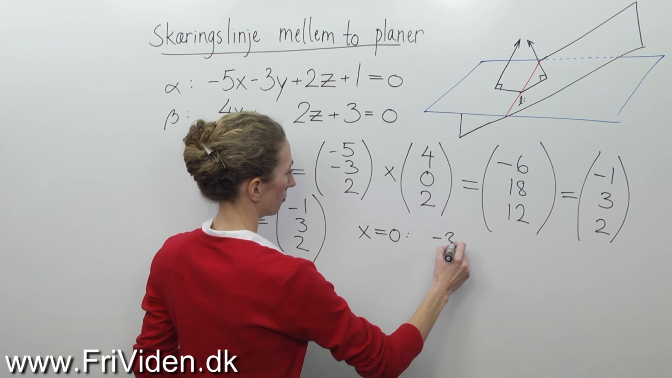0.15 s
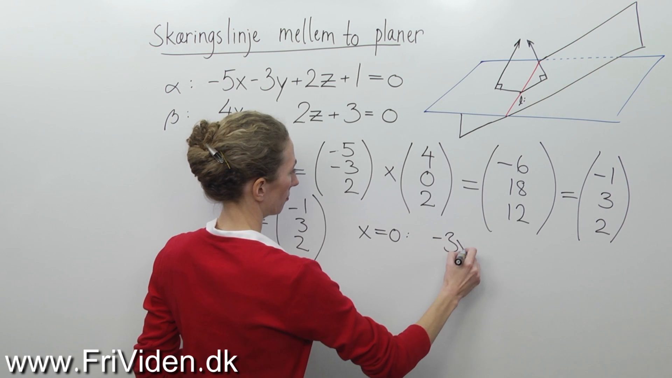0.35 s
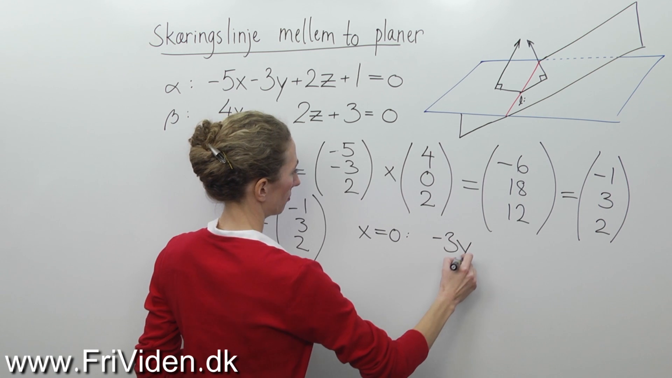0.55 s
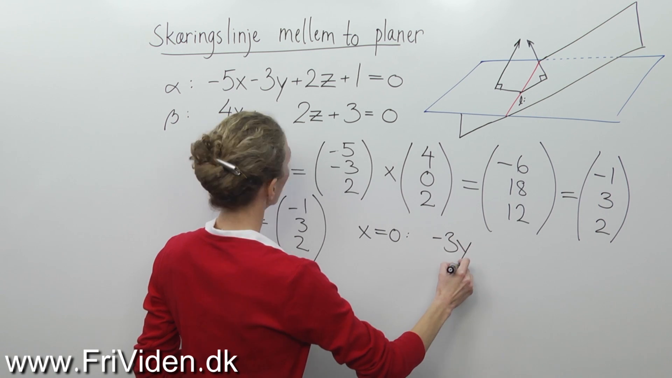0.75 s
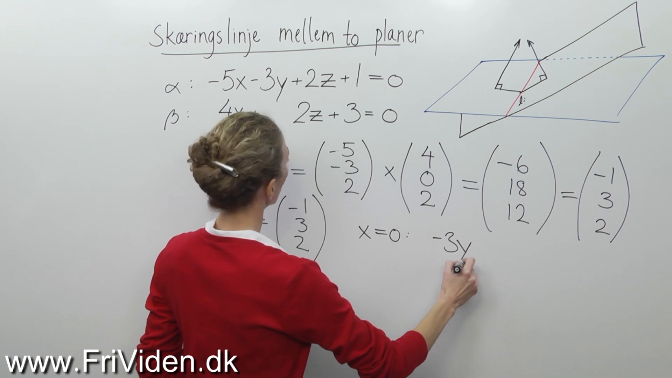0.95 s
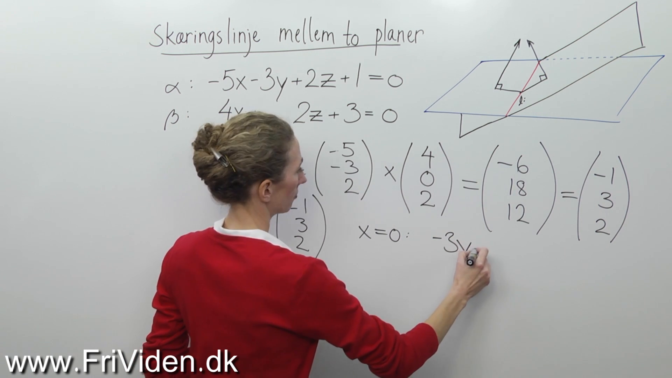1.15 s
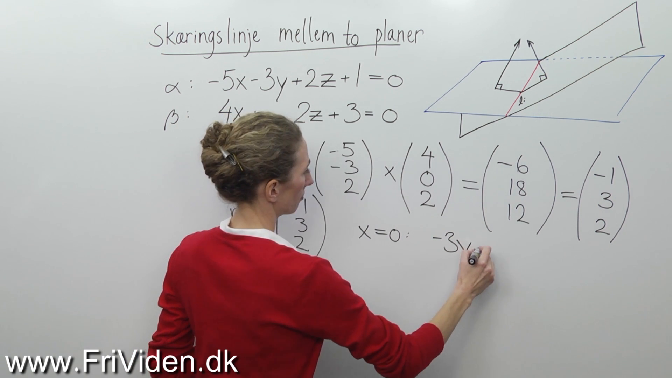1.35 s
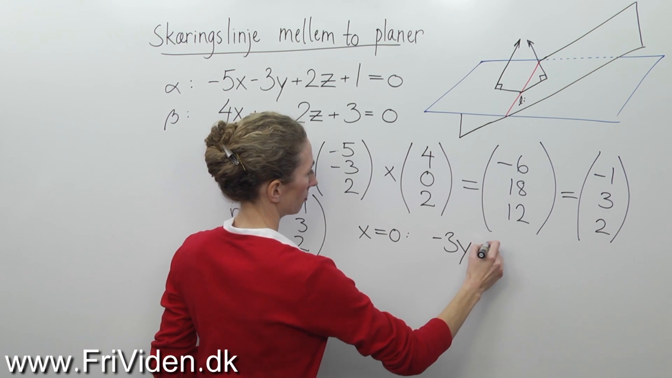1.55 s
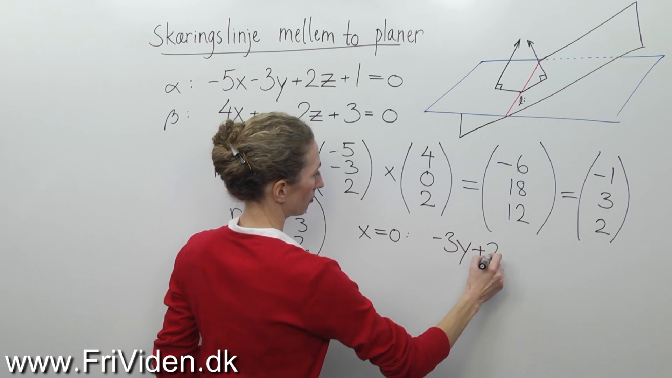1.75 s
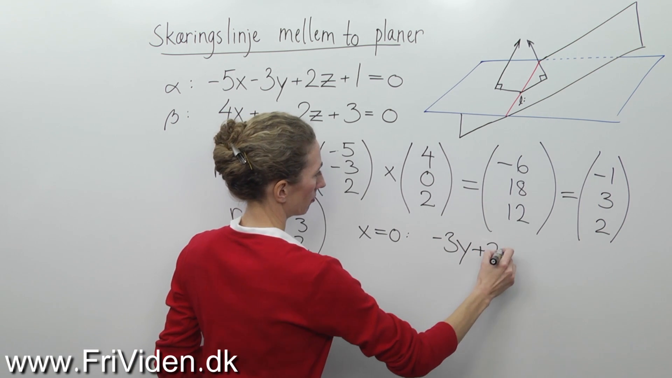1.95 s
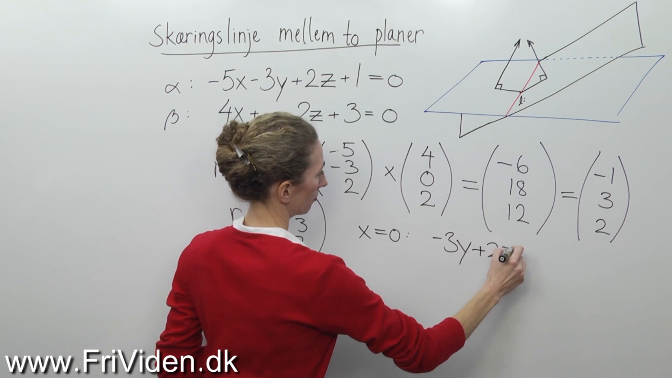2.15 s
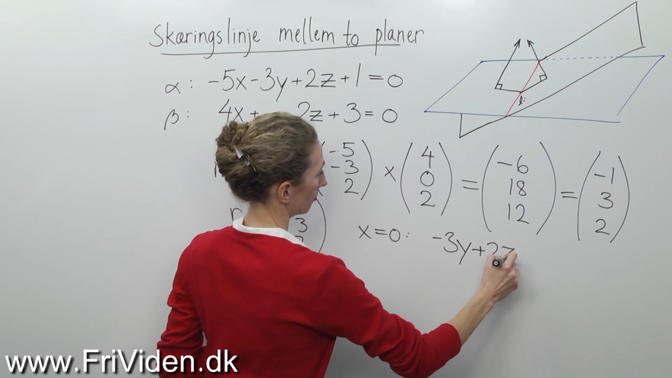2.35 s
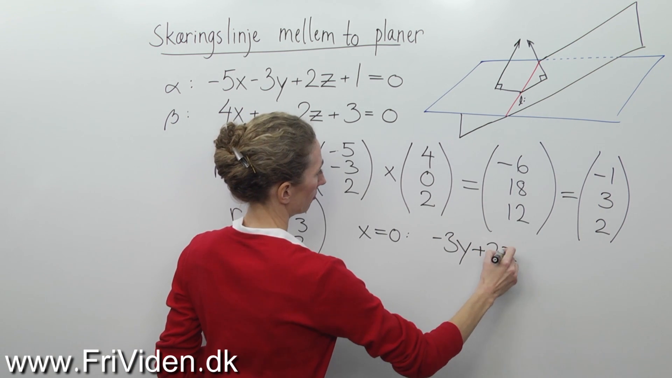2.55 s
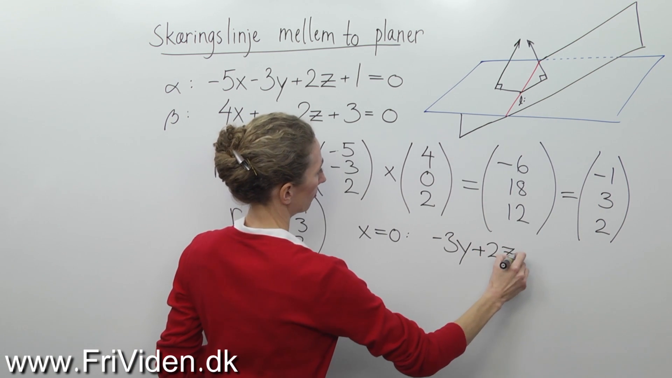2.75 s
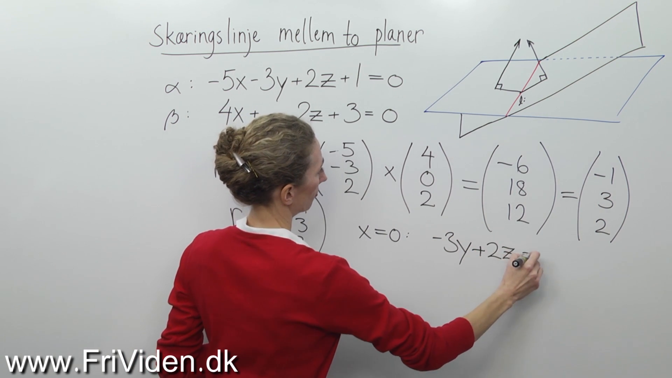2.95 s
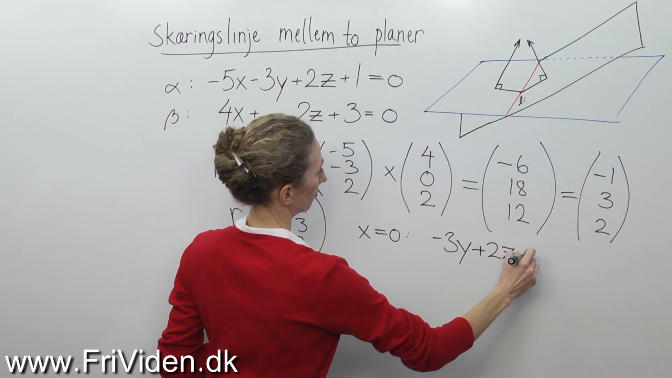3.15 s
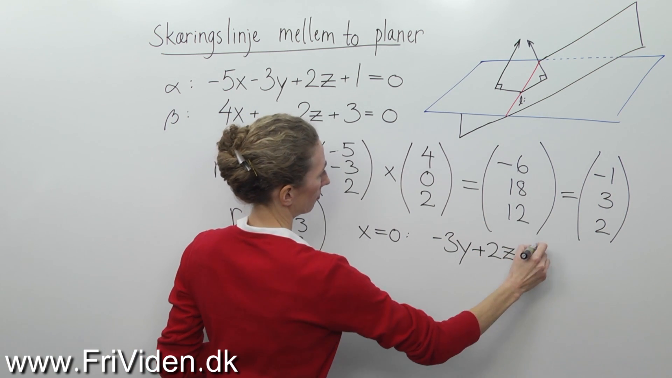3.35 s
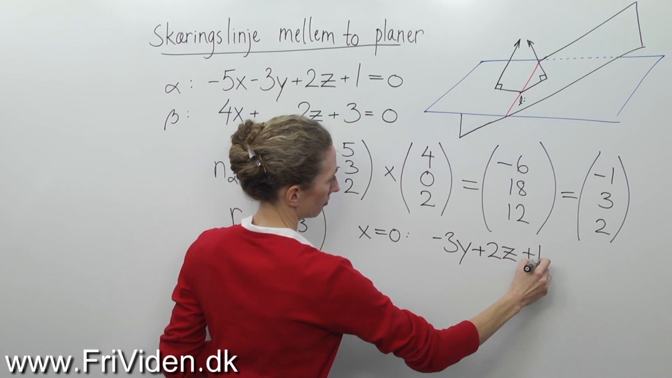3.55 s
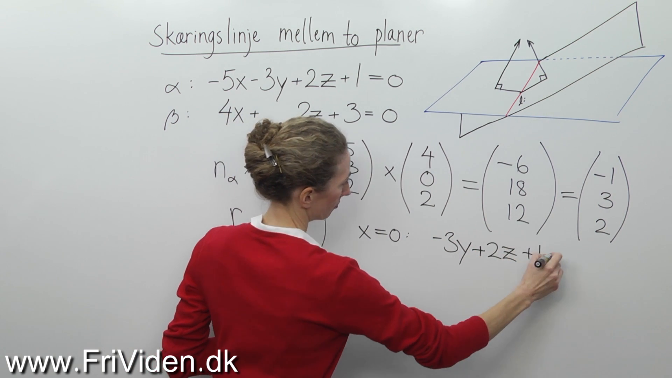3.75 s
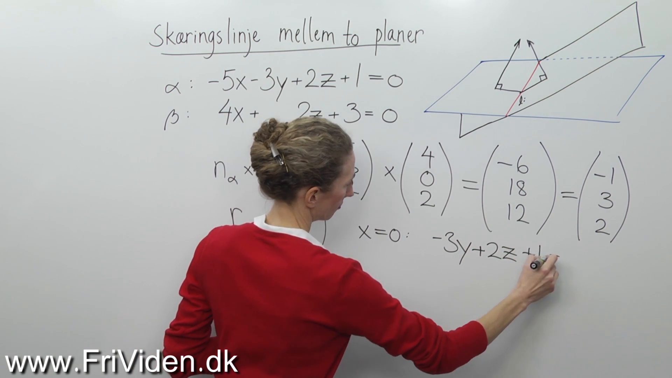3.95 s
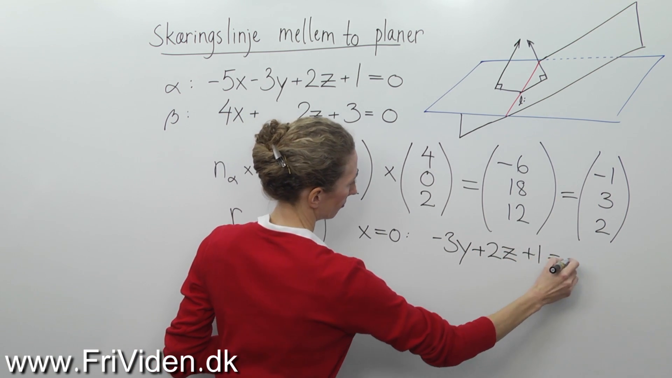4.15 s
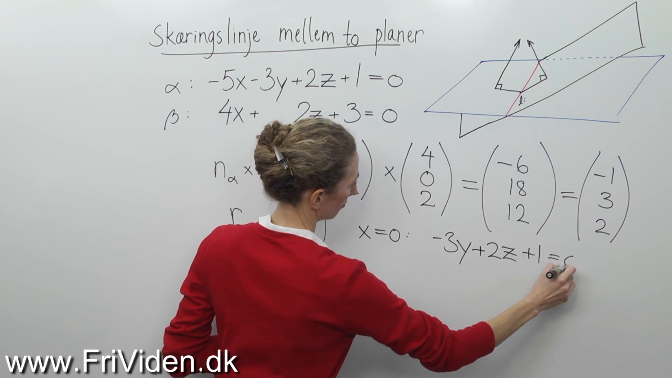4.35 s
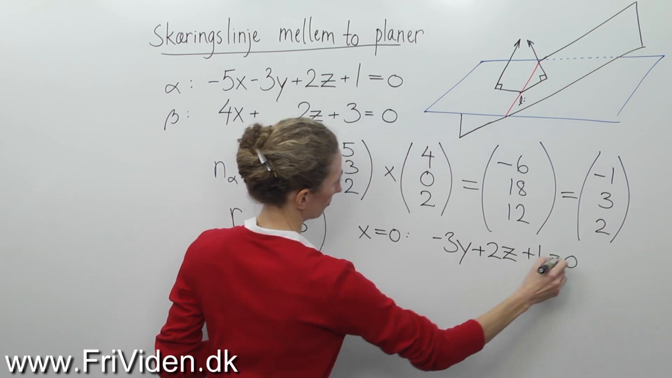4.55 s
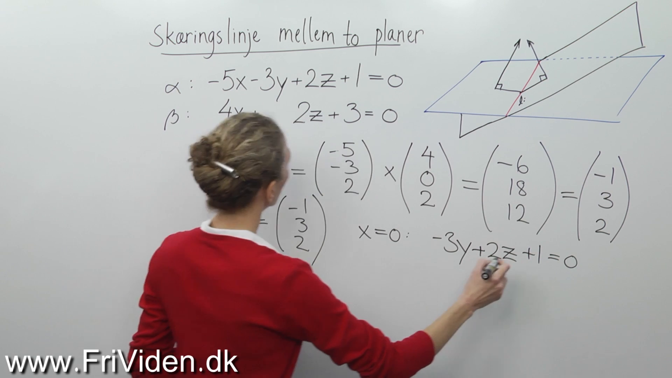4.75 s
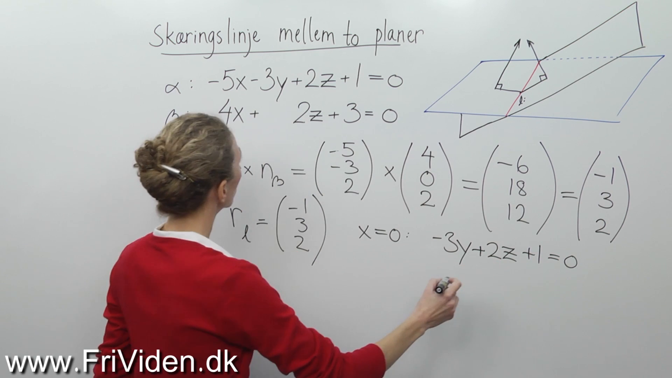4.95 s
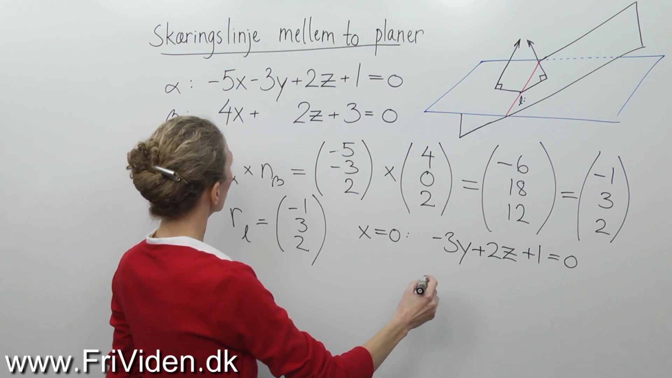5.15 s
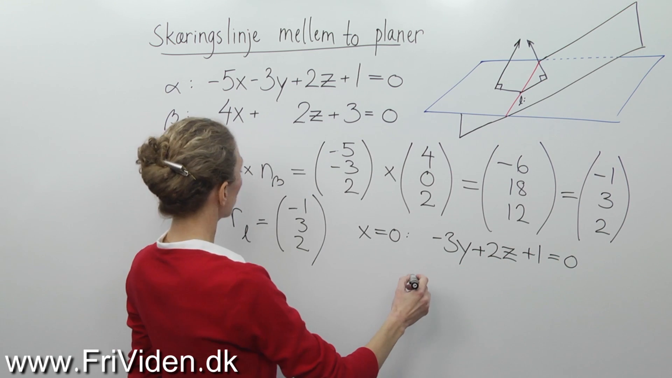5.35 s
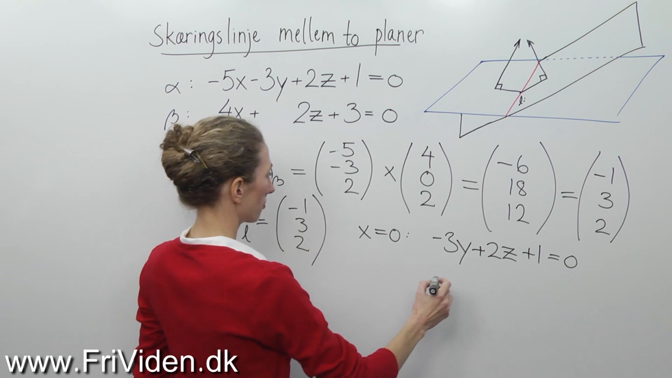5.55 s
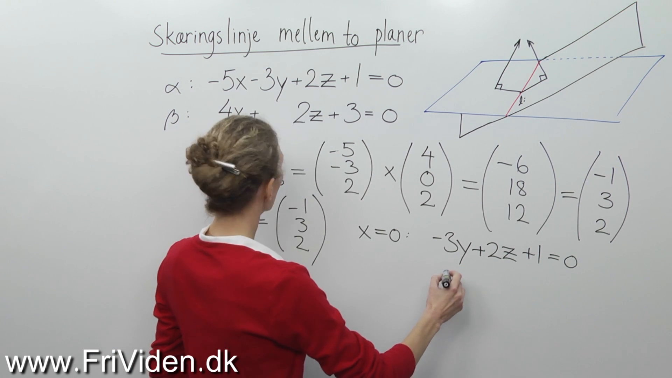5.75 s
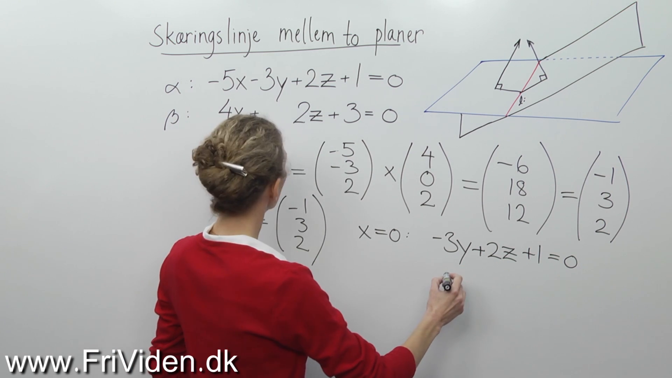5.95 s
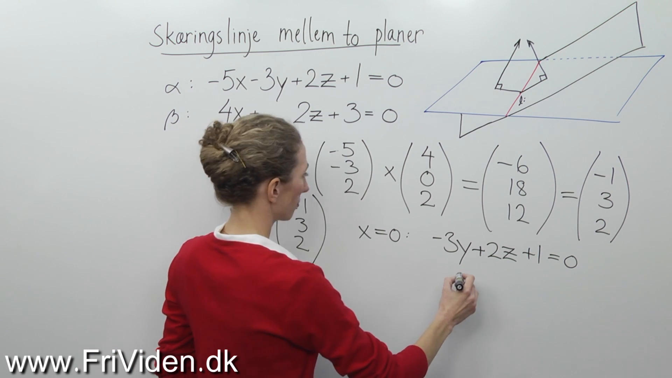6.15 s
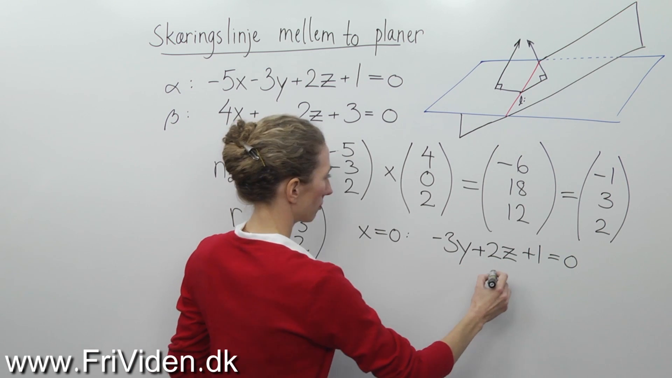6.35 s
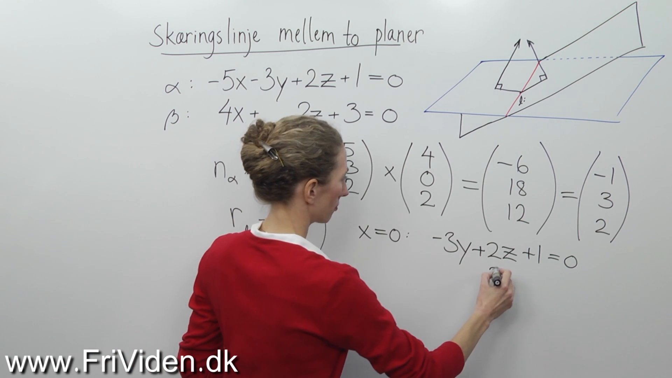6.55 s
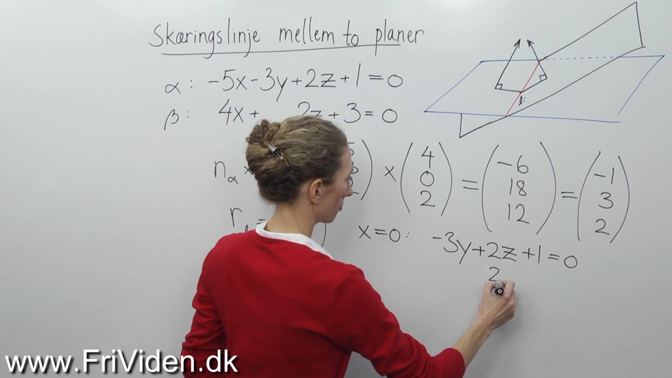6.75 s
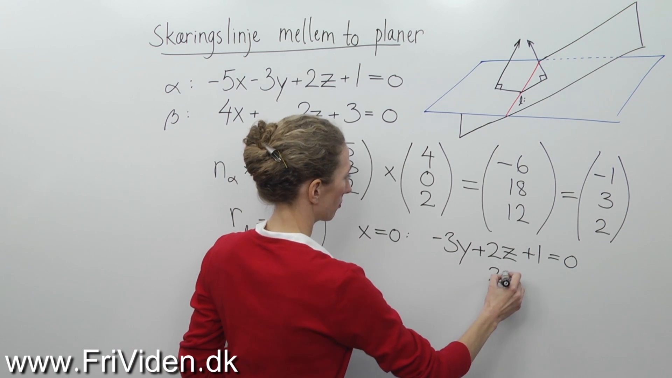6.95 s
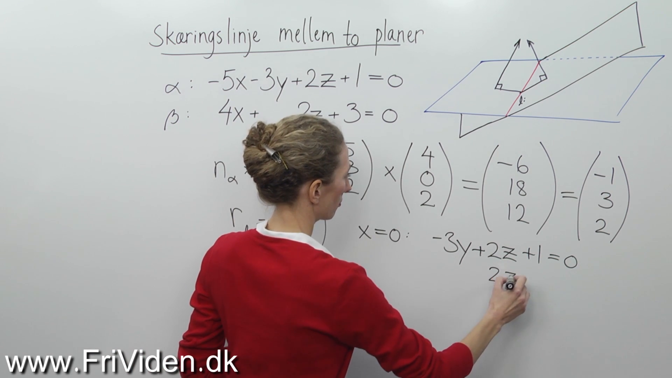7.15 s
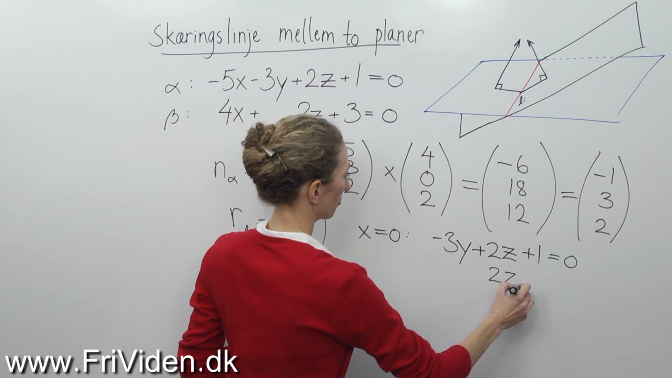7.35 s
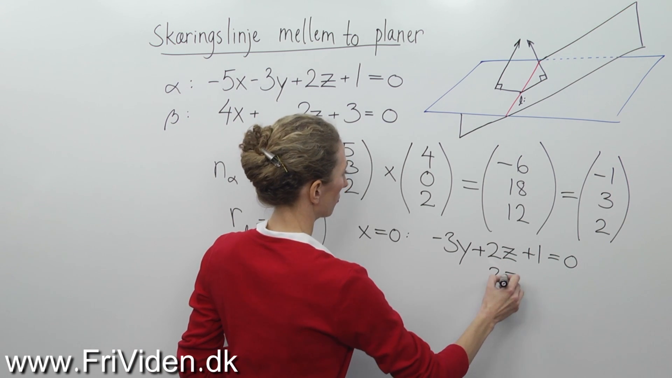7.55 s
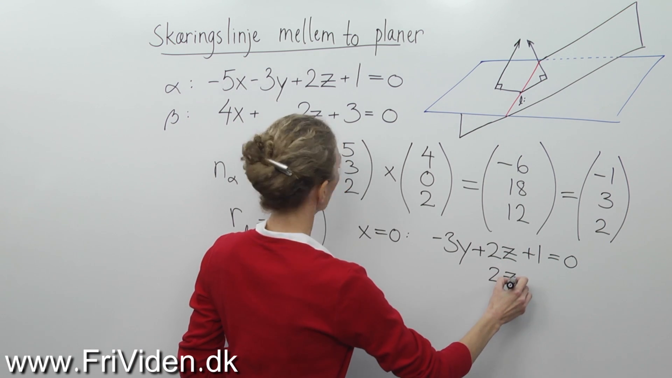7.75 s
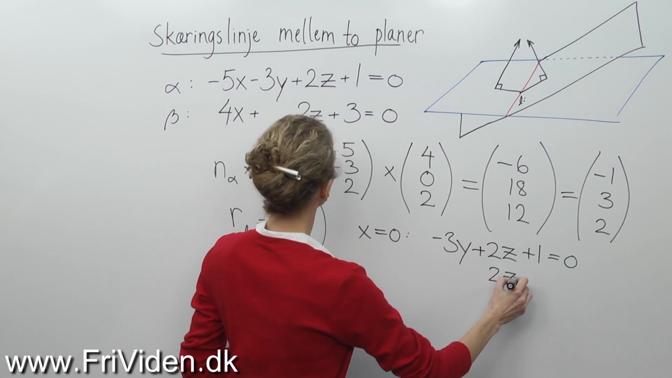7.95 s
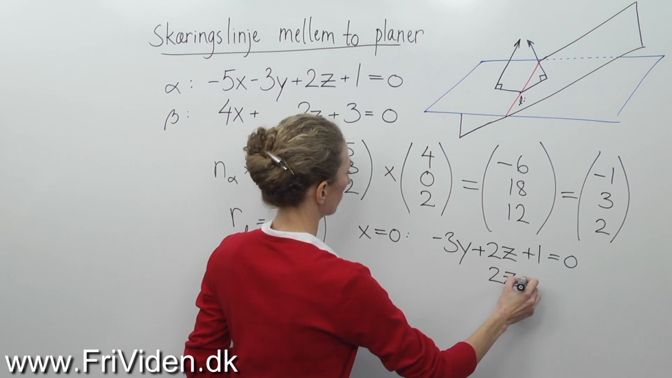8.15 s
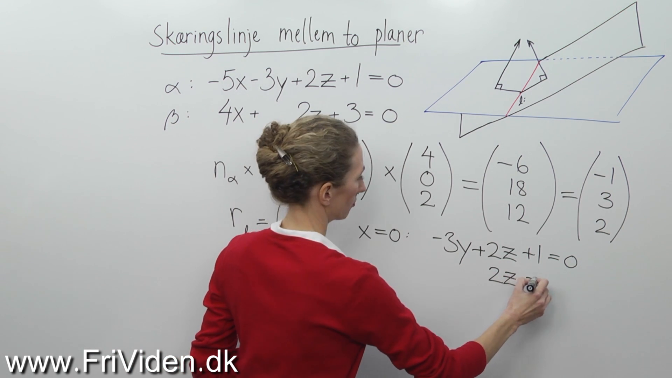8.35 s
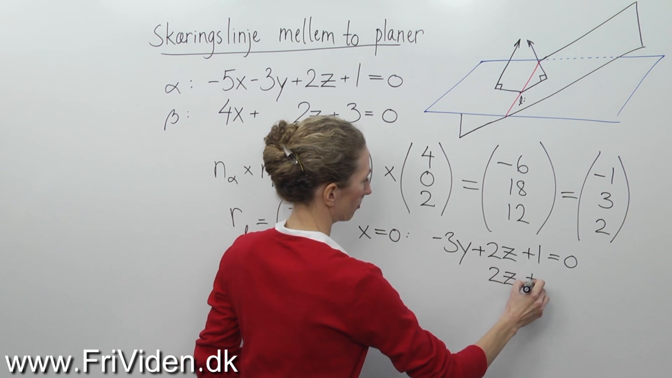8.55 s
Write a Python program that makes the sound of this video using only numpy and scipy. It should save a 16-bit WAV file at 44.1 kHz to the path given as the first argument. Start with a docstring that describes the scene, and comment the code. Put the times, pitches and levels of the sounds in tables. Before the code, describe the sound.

A felt marker taps and softly hisses across a whiteboard in short strokes, pauses with faint rustles, then resumes, over low room rumble.

```python
"""In a quiet classroom, a felt marker writes short signs on a wall-mounted whiteboard.
Each landing of the tip knocks the board: a short thud and dying sines, with echoes from the room.
Each stroke is a faint hiss, made of many tiny clicks that ring the tip.
A steady noise floor, from low rumble to faint hiss, lies under it with a fan's narrow tones.
A few faint noise rustles are heard as the arm comes away."""
import sys
import numpy as np
from scipy import signal
from scipy.io import wavfile
from scipy.ndimage import uniform_filter1d

SR = 44100
rng = np.random.default_rng(int(sys.argv[2]) if len(sys.argv) > 2 else 0)


def inscribe(sig):
    """Save sig as 16-bit PCM at rate SR to the path in sys.argv[1].

    A 1-D sig is mono; a 2-D sig holds one channel per row.
    Samples are clipped to [-1, 1] before scaling.
    """
    pcm = np.round(np.clip(np.atleast_2d(sig).T, -1, 1) * 32767)
    wavfile.write(sys.argv[1], SR, pcm.astype(np.int16))


N = 380334  # length in samples


def gain_of(db):
    """Turns decibels into an amplitude factor."""
    return 10 ** (np.asarray(db) / 20)


def evened(x):
    """Scales a sound to an rms level of 1."""
    return x / np.sqrt(np.mean(x ** 2) + 1e-20)


def slow_wander(samples):
    """Random ups and downs of rms 1: noise averaged over a number of samples."""
    return evened(uniform_filter1d(rng.standard_normal(N), samples))


def read_curve(points, hz):
    """Reads a curve between its points, along a logarithmic pitch axis."""
    point_hz, value = np.transpose(points)
    return np.interp(np.log(hz + 1), np.log(point_hz + 1), value)


def add(mix, start_s, sound):
    """Mixes a sound in at its start time."""
    part = mix[max(round(start_s * SR), 0):][:len(sound)]
    part += sound[:len(part)]


def resonate(x, hz, width_hz):
    """Rings at one pitch with a peak gain of 1; a narrower width rings longer."""
    decay = np.exp(-np.pi * width_hz / SR)
    turn = np.exp(2j * np.pi * min(hz, 0.49 * SR) / SR)
    return 2 * signal.lfilter([1 - decay], [1, -decay * turn], x).real


def noise_floor():
    """Steady noise: random waves of every pitch, weighted by a spectrum."""
    # strong low rumble thinning to faint hiss, cut off steeply near 15.9 kHz:
    # pitch_hz, relative level_db (per Hz)
    floor_spectrum = [(10, -8.5), (25, -11.5), (58, -1), (75, -2.5), (92, -7), (120, -9), (250, -15.5),
                      (500, -24.5), (1000, -31.5), (2500, -39), (6000, -43), (13400, -46), (15750, -46),
                      (15950, -73)]
    floor_db = -55  # rms level
    hz = np.fft.rfftfreq(4096, 1 / SR)
    real, imaginary = rng.standard_normal((N // 1024 + 5, len(hz), 2)).T
    spectrum = (real + 1j * imaginary) * gain_of(read_curve(floor_spectrum, hz)[:, None])
    noise = signal.istft(spectrum, nperseg=4096, noverlap=3072)[1][:N]
    return gain_of(floor_db) * evened(noise)


def fan_tones():
    """The ventilation fan hums: each blade tone is a steady sine plus narrow noise around it."""
    # blade tones of the fan: multiple of fan_hz, width_hz of the noisy part, level_db (rms)
    blade_tones = [(1, 4, -67.5), (4, 3, -87), (5, 3, -84)]
    fan_hz = 170
    t, out = np.arange(N) / SR, np.zeros(N)
    for multiple, width_hz, level_db in blade_tones:
        tone_hz = multiple * fan_hz
        steady = np.sqrt(2) * np.sin(2 * np.pi * tone_hz * t)
        unsteady = 1.7 * evened(resonate(rng.standard_normal(N), tone_hz, width_hz))
        out += gain_of(level_db) * evened(steady + unsteady)
    return out


def fibre_slips():
    """Felt fibres slip on the board: dense tiny clicks of uneven strength, stronger in clumps."""
    slips_per_s, spread_db = 7000, 2.5
    slips = (rng.random(N) < slips_per_s / SR) * rng.choice([-1., 1.], N)
    slips *= gain_of(spread_db * np.minimum(rng.exponential(1, N), 5))
    return slips * gain_of(1.5 * slow_wander(250))


def ring_tip(slips, resonances):
    """The slips ring the tip; each resonance is passed twice for steeper sides."""
    ringing = np.zeros(N)
    for hz, width_hz, level_db in resonances:
        once = resonate(slips, hz, width_hz)
        ringing += gain_of(level_db) * resonate(once, hz, width_hz)
    return evened(ringing)


def felt_strokes():
    """The felt slides: flat and edge of the tip hiss differently, and the barrel squeaks."""
    # strokes: middle_s, length_s (at half power), level_db (rms of the full hiss, without squeak),
    # share drawn with the edge of the tip (0-1)
    strokes = [(0.028, 0.032, -71.6, 0.7), (0.108, 0.055, -70, 0.4), (0.353, 0.062, -72, 0.6),
               (0.46, 0.055, -75, 0.25), (0.611, 0.1, -74.3, 0.3), (1.249, 0.054, -70.5, 0.2),
               (1.456, 0.042, -78, 0), (1.671, 0.054, -72, 0.1), (1.749, 0.031, -73, 0),
               (1.857, 0.056, -69, 0.1), (2.152, 0.053, -69.5, 0), (2.322, 0.062, -77, 0),
               (2.448, 0.055, -71.5, 0), (2.725, 0.048, -69.5, 0), (2.994, 0.056, -72.5, 0),
               (3.261, 0.076, -81, 0), (3.528, 0.09, -79, 0), (3.834, 0.06, -73.5, 0),
               (4.08, 0.039, -74, 0), (4.418, 0.089, -74, 0.1), (4.541, 0.039, -77, 0.2),
               (6.629, 0.042, -70, 1), (6.702, 0.036, -75, 0.8), (6.819, 0.056, -65.5, 1),
               (7.094, 0.054, -69, 0.8), (7.241, 0.064, -76, 0.6), (7.399, 0.059, -68.2, 0.7),
               (7.66, 0.048, -70, 0.84), (8.381, 0.045, -71, 0.8)]
    # ringing of the flat of the tip: pitch_hz, width_hz (of each pass), level_db
    flat_resonances = [(3730, 8000, -7.5), (7200, 1600, -4), (10120, 3700, 3), (13000, 5700, -12.5),
                       (15900, 840, -4)]
    # ringing of the edge of the tip: pitch_hz, width_hz (of each pass), level_db
    edge_resonances = [(4970, 3200, -11.5), (6900, 600, -8), (8400, 1300, -7.5), (11500, 13000, -17),
                       (16300, 3500, -0.5)]
    barrel_hz, barrel_width_hz = 2860, 120
    squeak_flat_db, squeak_edge_db = -12.5, -34  # against the hiss: more squeak under the flat

    slips = fibre_slips()
    flat = ring_tip(slips, flat_resonances)
    edge = ring_tip(slips, edge_resonances)
    squeak = evened(resonate(slips, barrel_hz, barrel_width_hz))
    t, out = np.arange(N) / SR, np.zeros(N)
    for middle_s, length_s, level_db, share in strokes:
        share = np.clip(share, 0, 1)
        hiss = np.sqrt(1 - share) * flat + np.sqrt(share) * edge
        squeak_db = squeak_flat_db + (squeak_edge_db - squeak_flat_db) * share
        # the hand speeds up and slows down
        speed = 0.5 ** (abs(2 * (t - middle_s) / length_s) ** 2.4 / 2)
        out += gain_of(level_db) * speed * (hiss + gain_of(squeak_db) * squeak)
    return out


def mode(hz, level_db, t60_s, rise_s):
    """A dying sine (60 dB down after t60_s); the soft felt lets it swell up instead of clicking."""
    t = np.arange(SR // 2) / SR
    swell = (1 - np.exp(-t / rise_s)) ** 2
    return -gain_of(level_db - 60 * t / t60_s) * swell * np.sin(2 * np.pi * hz * t)


def thud(lower, place, sharp):
    """The panel gives while the tip presses in, then is damped; a soft landing presses in slower."""
    # the thud: level_db, length_s, rise_s of a sharp landing
    level_db, length_s, sharp_rise_s = (-3.43, 0.011, 0.0012)
    left_hz, right_hz, soft_rise_s = 281.5, 294, 0.0016
    hz = left_hz + (right_hz - left_hz) * place  # higher to the right
    if lower:
        hz *= 0.97  # lower in pitch on the lower line
    rise_s = soft_rise_s + (sharp_rise_s - soft_rise_s) * np.clip(sharp, 0, 1)
    sound = mode(hz, level_db, 0.71, rise_s)
    return sound * np.exp(-(np.arange(len(sound)) / SR / length_s) ** 3.13)


def knock(lower, strength_db, place, sharp):
    """One landing: a thud and the board's modes, shared out by line, place and sharpness."""
    # modes of the board, grouped in families: pitch_hz, level_db, t60_s, rise_s
    board_families = [
        [(60.8, -11, 0.58, 0.0069), (98.6, 2.5, 0.58, 0.012)],
        [(138.4, 2.5, 0.34, 0.0006)],
        [(198, -4, 0.071, 0.0033), (223.7, 10.5, 0.24, 0.0038)],
        [(257.8, -6.5, 0.2, 0.0051), (379.4, -9, 0.27, 0.015), (429, -1, 0.12, 0.0085)],
        [(485, -3, 0.21, 0.0072), (538, -6, 0.025, 0.0023), (588, 4, 0.042, 0.0018)],
        [(689, -10, 0.1, 0.0026), (732.3, 9.5, 0.037, 0.0012), (842, -12.5, 0.13, 0.0019)],
        [(948, 3, 0.063, 0.00052), (1066, -2, 0.078, 0.0031)],
        [(1227, 1, 0.048, 0.00034), (1500, 0, 0.034, .001), (1785, 0, 0.028, 0.0011)],
    ]
    # the places across the writing that the next table uses: place (0-1, left to right)
    known_places = [0, .45, .8, 1]
    # what each family gets: level_db at each of the four places (four columns),
    # change on the lower line (dB), gain from a sharp landing (dB)
    family_shares = [(-34, -22.5, -23.5, -17.5, 3.5, 4), (-25.5, -18, -15.5, -12, 1.5, 1),
                     (-16, -22.5, -36.5, -18.5, -16, -3), (-19, -23, -13.5, -16, 0.5, 1),
                     (-22.5, -23, -27.5, -22, -2, 9), (-32, -28, -26.5, -37, -5, 17.5),
                     (-39, -45.5, -47.5, -38.5, 2, 22), (-55, -46, -50.5, -29, -1, 10.5)]

    out = thud(lower, place, sharp)
    for (*place_db, lower_db, sharp_db), family in zip(family_shares, board_families):
        share_db = np.interp(place, known_places, place_db) + lower * lower_db + sharp * sharp_db
        out = out + gain_of(share_db) * sum(mode(*row) for row in family)
    return gain_of(strength_db) * out


def board_knocks():
    """Each landing of the tip strikes the board; later landings are on the lower line."""
    # landings: start_s, strength_db, place (0-1, left to right), sharpness (0-1)
    landings = [(0.287, -26, 0.21, 0.75), (1.186, -27, 0.09, 0.9), (1.387, -25, 0.18, 0.82),
                (1.609, -24.5, 0.27, 0.98), (2.083, -26.5, 0.49, 0.58), (2.654, -32, 0.51, 0),
                (2.945, -27, 0.7, 0.37), (3.18, -27, 0.78, 0.54), (3.467, -26, 0.72, 0.4),
                (3.799, -24.5, 0.85, 0.62), (4.019, -25.5, 0.87, 0.75), (4.282, -28.5, 0.93, 0.8),
                (6.569, -30, 0.34, 0.36), (7.025, -27, 0.35, 0.27), (7.607, -28.5, .51, .01),
                (8.319, -27, 0.64, 0.34), (8.517, -25, 0.58, 0.45)]
    lower_line_s = 6
    out = np.zeros(N)
    for start_s, *blow in landings:
        add(out, start_s, knock(start_s > lower_line_s, *blow))
    return out


def room(x):
    """Single echoes from nearby walls and a diffuse tail that dies faster in the treble."""
    # echoes: delay_s, level_db
    wall_echoes = [(.024, -10), (0.042, -35)]
    # how long the tail takes to die by 60 dB: pitch_hz, t60_s
    decay_times = [(210, 0.29), (560, 0.28), (1470, 0.11)]
    tail_db, rise_s = -8, 0.0054  # level set before the soft start

    hz, t, spectrum = signal.stft(rng.standard_normal(SR // 2), SR, nperseg=512)
    fading = gain_of(-60 * t / read_curve(decay_times, hz)[:, None])
    tail = signal.istft(spectrum * fading, SR, nperseg=512)[1]
    soft_start = 1 - np.exp(-np.arange(len(tail)) / SR / rise_s)
    tail *= gain_of(tail_db) / np.linalg.norm(tail) * soft_start
    for delay_s, level_db in wall_echoes:
        add(tail, delay_s, gain_of([level_db]))
    # only the part above about 240 Hz goes into the room
    upper = signal.sosfilt(signal.butter(4, 240, "high", fs=SR, output="sos"), x)
    return signal.fftconvolve(upper, tail)[:N]


def rustle():
    """Faint rustles as the arm comes away: uneven broad noise that swells up and breaks off."""
    # rustles: peak_s, level_db
    rustles = [(4.962, -78), (5.05, -77), (5.148, -77), (5.226, -72), (5.374, -76)]
    rise_db_per_s, fall_db_per_s = 180, 500
    t, swells = np.arange(N) / SR, np.zeros(N)
    noise = rng.standard_normal(N) * gain_of(3 * slow_wander(300))
    for peak_s, level_db in rustles:
        drop_db = np.maximum(rise_db_per_s * (peak_s - t), fall_db_per_s * (t - peak_s))
        swells += gain_of(level_db - drop_db)
    return evened(resonate(noise, 5000, 6000)) * swells


def scene():
    """Mixes noise floor, fan, strokes, knocks with their room, and rustles into one channel."""
    knocks = board_knocks()
    mix = noise_floor() + fan_tones() + felt_strokes() + knocks + room(knocks) + rustle()
    return mix[None]


def record(dry):
    """Limits the band: a steep filter takes away what lies above its cutoff."""
    cutoff_hz = 17170
    low_pass = signal.firwin(1023, cutoff_hz, window=("kaiser", 9), fs=SR)
    return signal.oaconvolve(dry, low_pass[None], "same")


dry = scene()
out = record(dry)
inscribe(out)
```